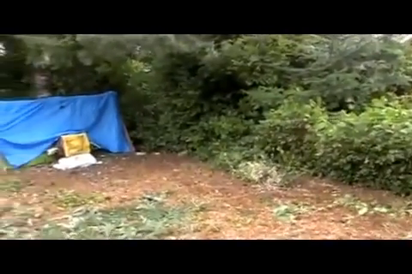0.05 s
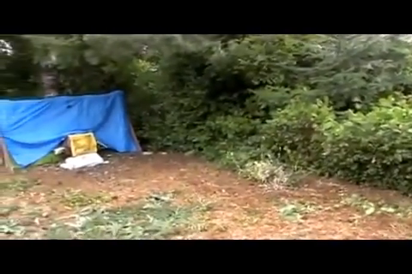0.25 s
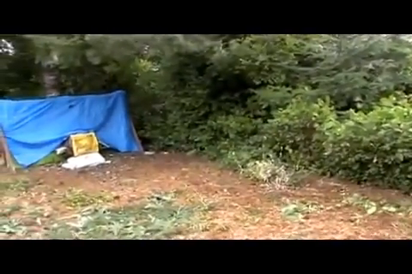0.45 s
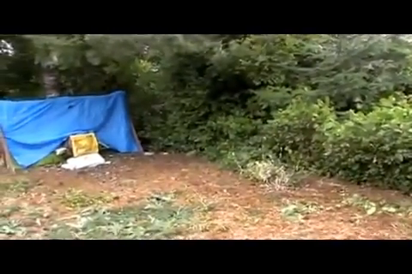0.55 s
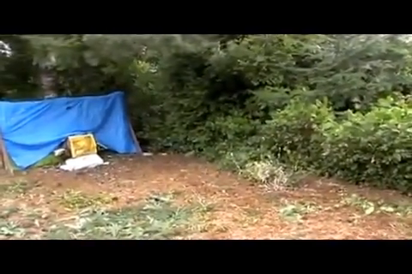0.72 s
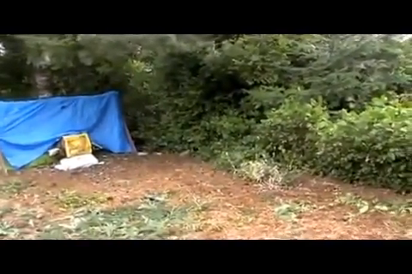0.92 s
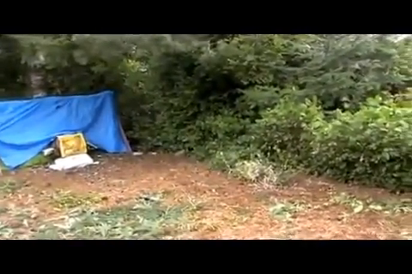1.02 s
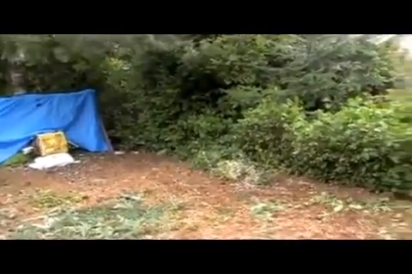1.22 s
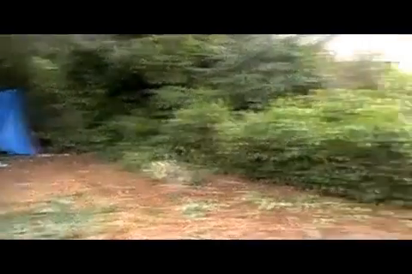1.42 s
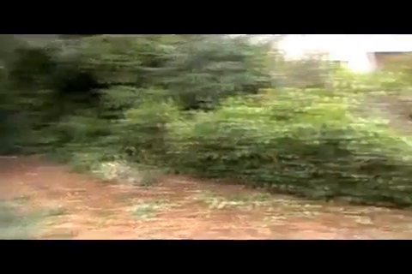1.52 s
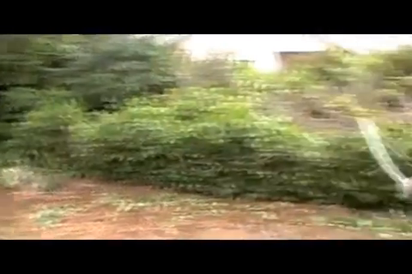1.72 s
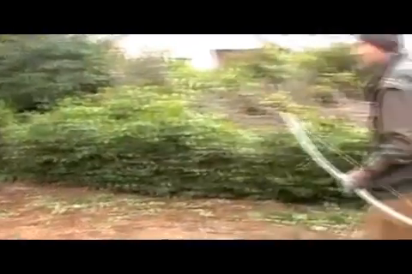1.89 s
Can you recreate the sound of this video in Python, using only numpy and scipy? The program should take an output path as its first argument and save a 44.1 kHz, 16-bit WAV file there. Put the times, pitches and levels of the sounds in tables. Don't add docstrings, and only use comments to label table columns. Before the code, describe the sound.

A bow shot in a garden, heard on a small camera microphone. Faint outdoor hush, then at 0.17 s the string slaps hard and rattles, limbs ringing briefly. After a tiny dropout, the arrow cracks into the target at 0.43 s, the loudest moment, with scattered echoes and a fading tail. Sharp gear clicks at 1.02 and 1.28 s, a knock at 1.45 s, then faint leaf ticks and soft air puffs.

```python
import sys
import numpy as np
from scipy import signal
from scipy.fft import rfft, irfft
from scipy.io import wavfile
from scipy.ndimage import uniform_filter1d

SR = 44100
rng = np.random.default_rng(int(sys.argv[2]) if len(sys.argv) > 2 else 0)


def magnitude_from_level(level_db):
    exponent = np.asarray(level_db, float) / 20
    return 10 ** exponent


def unload_wav(signal):
    wavfile.write(
        sys.argv[1],
        SR,
        np.round(np.clip(np.atleast_2d(signal).T, -1, 1) * 32767).astype(np.int16),
    )


N = 85995

# [f/Hz, level/dB]
HUSH_COLOUR = [(15, -56), (25, -60), (129, -38), (207, -9.5), (1270, -4), (1370, -8), (1950, -9.5),
               (4370, -19.5), (10300, -22), (13400, -63), (22000, -120)]
# [t/s, level/dB]
HUSH_LEVEL = [(0.0, -56), (0.2, -54.5), (0.351, -52), (0.76, -57.5), (0.95, -54.5), (1.254, -54),
              (1.482, -54), (1.95, -55)]
# [f/Hz, balance/dB]
HUSH_BALANCE = [(60, -15), (170, -4), (460, 11.5), (1280, 2), (3550, 0.5), (9840, 2.5)]
# [t/s, level/dB, length/s]
PUFFS = [
    (0.162, -60.5, 0.021),
    (0.206, -63, 0.05),
    (0.45, -60.5, 0.0067),
    (1.003, -70, 0.044),
    (1.166, -71.5, 0.055),
    (1.411, -61, 0.016),
    (1.49, -68, 0.11),
    (1.668, -67.5, 0.038),
]
# [t/s, level/dB, length/s, centre f/Hz, spread/octaves]
CRACKLES = [(.4038, -45, .007, 3000, 1.5), (.5905, -38, .006, 3800, 1.1), (.8478, -56, .02, 8500, .6),
            (1.016, -42, .004, 7500, .8), (1.0183, -31, .006, 5500, 2.2), (1.022, -44, .022, 7600, .3),
            (1.2797, -36, .007, 5500, 1.8), (1.296, -46, .004, 3000, 1), (1.4015, -49, .006, 2500, 1),
            (1.415, -48, .04, 2200, 1.4), (1.545, -52, .02, 2000, .8), (1.569, -47, .005, 3200, 1),
            (1.5955, -49, .004, 8500, .9), (1.599, -55, .03, 1700, .5), (1.6275, -46, .005, 8500, 1.2),
            (1.652, -52, .008, 6000, 1.8), (1.70, -55, .04, 1600, .4), (1.822, -52, .025, 4500, 1.1),
            (1.839, -48, .005, 4500, 1), (1.915, -54, .025, 7000, .35)]
# [t/s, level/dB, f/Hz, t60/s]
KNOCKS = [(0.2323, -25.5, 1660, 0.014), (.343, -43, 2100, 0.02), (.3759, -40, 2087, 0.067),
          (.592, -36, 2960, 0.014), (0.594, -36, 4300, 0.0076), (0.603, -59.5, 473, 0.011),
          (0.628, -39.5, 3260, 0.02), (0.483, -42, 1485, .015), (.497, -37, 2030, 0.015),
          (0.546, -42.5, 1640, 0.017), (.562, -47, 2150, .012), (.581, -44, 1500, .012),
          (0.654, -50, 1912, 0.0091), (0.671, -51, 2250, 0.0084), (0.689, -46, 1530, 0.013),
          (.716, -42, 2010, 0.027), (.977, -41.5, 2500, 0.0073), (1.4437, -38, 1670, 0.015),
          (1.4484, -20, 730, 0.0061), (1.466, -36, 710, 0.013), (1.572, -42.5, 1810, 0.006),
          (1.598, -45.5, 714, 0.04), (1.841, -34, 1410, 0.0059)]
# [t/s, level/dB, f/Hz, t60/s]
SNAPS = [(1.0184, -24, 9500, .004), (1.0185, -20, 7700, .006), (1.0192, -24, 3700, .008),
         (1.0205, -35, 1500, .008), (1.0225, -27, 7200, .012), (1.2798, -33, 9500, .002),
         (1.2799, -31, 5500, .002), (1.28, -35, 3500, .003), (1.2833, -35, 7200, .004),
         (1.2835, -37, 4200, .006), (1.2962, -35, 3300, .006), (1.2972, -35, 2100, .014),
         (1.2975, -39, 3800, .005)]
# [f/Hz, level/dB, t60/s, hold/s]
FACE_MODES = [(1740, -1.5, .004, .0011), (8100, -5, .006, .0004), (7160, -7, .006, .0004),
              (9400, -7, .004, .0002), (6600, -9, .005, .0003), (5600, -8, .007, .0004),
              (4250, -9, .006, .0003), (3560, -11, .006, .0004), (2720, -11, .008, .0003),
              (480, -21, .025, .002), (850, -15, .01, 0)]
# [t/s, level/dB, left over right/dB, dulling/(dB/octave)]
ECHOES = [(.4322, -17, 6, -1), (.4396, -14, 7, -2), (.4428, -17, -3, -2), (.4528, -21, 3, -3),
          (.5096, -26, 2, -5), (.523, -33, 2, -5), (.535, -27, 2, -5), (.604, -35, 2, -7),
          (.6258, -38, 2, -2), (.640, -36, 2, -5), (.7086, -41, 2, -6)]
# [f/Hz, level/dB]
RETURN_COLOUR = [(88, -32), (200, -15.5), (460, -6.5), (1110, -5.5), (1750, 5.5), (2830, -6), (7620, -3),
                 (10300, -16.5), (13400, -59), (22000, -120)]
# [f/Hz, t60/s]
GARDEN_DECAY = [(100, 0.15), (500, 0.36), (1500, 0.13), (2500, 0.17), (5000, 0.18), (10000, 0.11)]
# [f/Hz, t60/s]
FAR_DECAY = [(100, 0.17), (500, 1.8), (1500, 1.16), (2500, 1.37), (5000, 0.68), (10000, 0.65)]
# [t/s, level/dB]
STRING_LEVEL = [
    (0.159, -83),
    (0.1611, -37),
    (0.1705, -35.5),
    (0.1725, -19.5),
    (.189, -21.5),
    (0.196, -33),
    (0.222, -41),
    (.26, -52),
]
# [f/Hz, level/dB]
STRING_COLOUR = [(35, -63), (60, -35), (162, -52), (416, -23), (1170, -7), (1690, -16), (1960, -3.5),
                 (2380, -12.5), (6500, -6), (10300, -15), (13400, -67), (22000, -120)]
# [t/s, level/dB, f/Hz, t60/s]
SLAPS = [(.1725, -8, 3300, .004), (.1727, -13, 5000, .004), (.1740, -15, 1250, .01), (.1752, -12, 950, .01),
         (.1755, -4, 4200, .002), (.1805, -13, 1950, .03), (.1843, -10, 3200, .005),
         (.1858, -19, 7400, .008), (.1865, -17, 2000, .015), (.188, -14, 3500, .006),
         (.192, -16, 2500, .006), (.204, -26, 4200, .012), (.2095, -25, 3000, .008),
         (.2125, -26, 2000, .012), (.2205, -28, 1900, .01), (.2375, -30, 2200, .01)]
# [f/Hz, level/dB, t60/s]
LIMB_MODES = [(417, -4, 0.32), (714, -8, 0.32), (1206, 6.5, 0.091), (1203, -28, 0.18), (1527, -2, 0.4),
              (2160, 6.5, 0.12), (2900, -38, 0.087), (4060, -21, 0.24), (3800, -19, 0.2), (4310, 5, 0.035),
              (4877, -32, 0.15), (5696, 0, 0.053)]
# fade starts, low from, low to, back [t/s]
GAP_S = (.409, .414, .421, .425)

SNAP_S, HIT_S = .172, .43


def evened(x):
    return x / np.sqrt(np.mean(x ** 2) + 1e-20)


def read(points, hz):
    f, value = np.transpose(points)
    return np.interp(np.log(hz + 1), np.log(f + 1), value)


def add(mix, start_s, sound):
    part = mix[..., round(start_s * SR):][..., :sound.shape[-1]]
    part += sound[..., :part.shape[-1]]


def tilt(x, db_per_octave):
    hz = np.fft.rfftfreq(len(x), 1 / SR)
    return irfft(rfft(x) * magnitude_from_level(db_per_octave * np.log2((hz + 150) / 2000)), len(x))


def ring(hz, db, t60_s, rise_s=0.00045, hold_s=0, sag=0):
    t = np.arange(round(min(t60_s + hold_s, .5) * SR) + 64) / SR
    turns = hz * np.cumsum(1 + sag * np.exp(-t / 0.067)) / SR
    decay = magnitude_from_level(db - 60 * np.maximum(t - hold_s, 0) / t60_s)
    return decay * np.minimum(t / rise_s, 1) * np.sin(2 * np.pi * turns)


def tail(x, decays, clump_db=.8):
    hz, t, z = signal.stft(rng.standard_normal((2, SR)), SR, nperseg=128)
    h = signal.istft(z * magnitude_from_level(-60 * t / read(decays, hz)[:, None]), SR, nperseg=128)[1]
    onset = np.minimum(np.arange(h.shape[1]) / (0.002 * SR), 1)
    h = h * onset * magnitude_from_level([[1.5], [-1.5]])
    clumps = uniform_filter1d(rng.standard_normal(h.shape[1]), size=200)
    clumps = uniform_filter1d(clumps, size=200)
    h = h * magnitude_from_level(clump_db * evened(clumps))
    return signal.fftconvolve(x[None], h / np.linalg.norm(h[0]), axes=1)[:, :N]


def near(x, pan_db, lag_samples):
    return np.array([np.roll(x, lag_samples), x]) * magnitude_from_level([[pan_db / 2], [-pan_db / 2]])


def hush():
    hum_hz, hum_width_hz, hum_db = 205, 22, -68
    frames, hz = N // 128 + 9, np.fft.rfftfreq(512, 1 / SR)
    a, b, patches = rng.standard_normal((frames, 257, 2, 3)).T
    patches = evened(uniform_filter1d(uniform_filter1d(patches[0], 8, 0), 16, 1))
    z = (a + 1j * b) * magnitude_from_level(read(HUSH_COLOUR, hz)[:, None] + 1.4 * patches)
    z = z * magnitude_from_level(np.array([.5, -.5])[:, None, None] * read(HUSH_BALANCE, hz)[:, None])
    wash = evened(signal.istft(z, nperseg=512, noverlap=384)[1][:, :N])
    t, db = np.transpose(HUSH_LEVEL)
    wash = wash * magnitude_from_level(np.interp(np.arange(N) / SR, t, db) + 0.5)
    r = np.exp(-np.pi * hum_width_hz / SR)
    poles = [1, -2 * r * np.cos(2 * np.pi * hum_hz / SR), r * r]
    hum = signal.lfilter([1], poles, rng.standard_normal((2, N)))
    return wash + magnitude_from_level(hum_db) * evened(hum - uniform_filter1d(hum, 900))


def puffs():
    t = np.arange(N) / SR
    band = signal.butter(2, [30, 135], "band", fs=SR, output="sos")
    low = evened(signal.sosfilt(band, rng.standard_normal((2, N))))
    return low * sum(magnitude_from_level(db - 10 * ((t - s) / length_s) ** 2) for s, db, length_s in PUFFS)


def ticks():
    out, t, hz = np.zeros(N), np.arange(4096) / SR, np.fft.rfftfreq(4096, 1 / SR)
    for s, db, length_s, centre_hz, spread_oct in CRACKLES:
        grains = rng.standard_normal(4096) * magnitude_from_level(2.5 * rng.exponential(1, 4096))
        grains = irfft(rfft(grains) * magnitude_from_level(-6 * (np.log2((hz + 1) / centre_hz) / spread_oct) ** 2))
        envelope = magnitude_from_level(db - 8 * (t / length_s) ** 2) * np.minimum(t / (.1 * length_s), 1)
        add(out, s, evened(grains) * envelope)
    for s, db, ring_hz, t60_s in KNOCKS + SNAPS:
        add(out, s, ring(ring_hz, db, t60_s, 1 / ring_hz))
    return out


def target():
    hit_db, hit_pan_db, hit_rise_s = -4.2, 5.0, .0002
    return_db, garden_db, far_db, scatter_s = 18, -11, -17, .002
    crack, dry, wide = np.zeros(8192), np.zeros(N), np.zeros(N)
    for hz, db, t60_s, hold_s in FACE_MODES:
        add(crack, 0, ring(hz, db + hit_db, t60_s, hit_rise_s, hold_s))
    add(dry, HIT_S, crack)
    colour = magnitude_from_level(return_db + read(RETURN_COLOUR, np.fft.rfftfreq(512, 1 / SR)))
    add(wide, HIT_S + 0.00119 - 256 / SR, np.roll(irfft(colour), 256))
    out = np.array([dry, uniform_filter1d(dry, size=3)]) * magnitude_from_level([[hit_pan_db / 2], [-hit_pan_db / 2]])
    t = np.arange(512) / SR
    for s, db, pan_db, dull_db in ECHOES:
        scatter = rng.standard_normal((2, 512)) * magnitude_from_level(-20 * t / (scatter_s + 0.06 * (s - HIT_S)))
        scatter[:, 0] = 6
        scatter /= np.linalg.norm(scatter, axis=1)[:, None]
        echo = signal.fftconvolve(tilt(np.roll(crack, 64), dull_db)[None], scatter, axes=1)
        add(out, s - 64 / SR, echo * magnitude_from_level([[db + pan_db / 2], [db - pan_db / 2]]))
    return out + magnitude_from_level(garden_db) * tail(wide, GARDEN_DECAY) + magnitude_from_level(far_db) * tail(wide, FAR_DECAY, clump_db=3.5)


def bow():
    slip_tilt_db_per_oct, limb_db, limb_sag, limb_delay_s = -5, -34, .07, .01
    t, (ts, db) = np.arange(N) / SR, np.transpose(STRING_LEVEL)
    clicks = rng.standard_normal(N) * magnitude_from_level(2.2 * rng.exponential(1, N))
    colour = magnitude_from_level(read(STRING_COLOUR, np.fft.rfftfreq(N, 1 / SR)))
    bright = evened(irfft(rfft(clicks) * colour, N))
    dull = evened(tilt(bright, slip_tilt_db_per_oct))
    rattle = np.where(t < SNAP_S, dull, bright)
    level_db = np.interp(t, ts, db, left=-120) + 5.5
    out = rattle * magnitude_from_level(level_db - 700 * np.maximum(t - ts[-1], 0))
    for s, slap_db, hz, t60_s in SLAPS:
        add(out, s, ring(hz, slap_db, t60_s))
    for hz, mode_db, t60_s in LIMB_MODES:
        low = hz < 500
        start_s = SNAP_S + limb_delay_s * low + 0.0048 * rng.random()
        add(out, start_s, ring(hz, mode_db + limb_db, t60_s, 0.0056, sag=limb_sag * low))
    return out


def scene():
    string, small = bow(), ticks()
    space = magnitude_from_level(-11) * tail(string, GARDEN_DECAY) + magnitude_from_level(-17.5) * tail(string, FAR_DECAY)
    space = space + magnitude_from_level(-9) * tail(small, GARDEN_DECAY)
    events = near(string, 0.5, 3) + near(small, 3.5, 4) + space + target()
    low_cut = signal.butter(2, 202, "high", fs=SR, output="sos")
    return signal.sosfilt(low_cut, events) + hush() + puffs()


def top_cut(x):
    return signal.sosfilt(signal.butter(12, 15700, fs=SR, output="sos"), x)


def record(dry):
    gap_db, smear_db, edge_hz = -35, -16, 10400
    x = dry * magnitude_from_level(np.interp(np.arange(N) / SR, GAP_S, [0, gap_db, gap_db, 0]))
    z = signal.stft(x, nperseg=448, noverlap=336)[2]
    a, b = rng.standard_normal((2,) + z.shape)
    z = z + magnitude_from_level(smear_db) * uniform_filter1d(abs(z), 9, 1) * (a + 1j * b)
    x = signal.istft(z, nperseg=448, noverlap=336)[1][:, :N]
    low_pass = signal.firwin(401, edge_hz, window=("kaiser", 8), fs=SR)
    x = signal.oaconvolve(x, low_pass[None], "same")
    return top_cut(np.clip(x, -.96, .96))


dry = scene()
out = record(dry)
unload_wav(out)
```